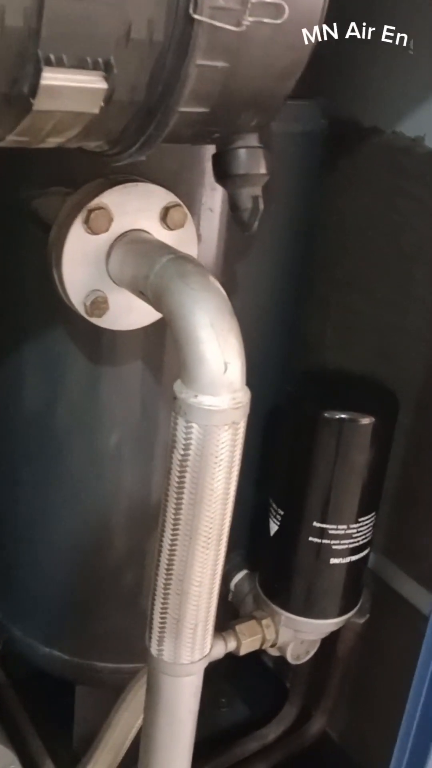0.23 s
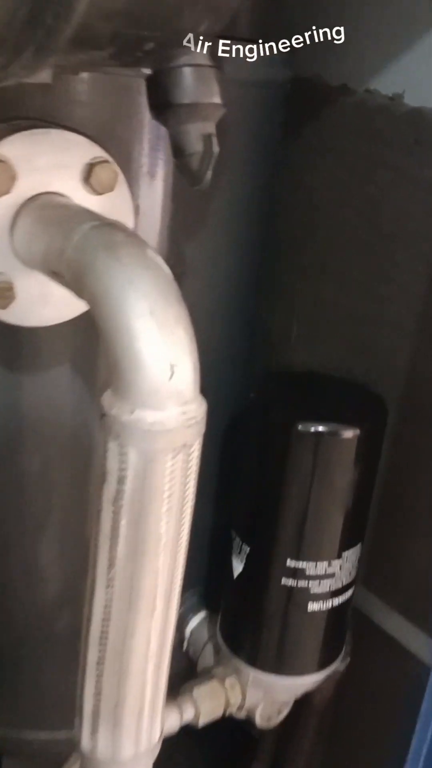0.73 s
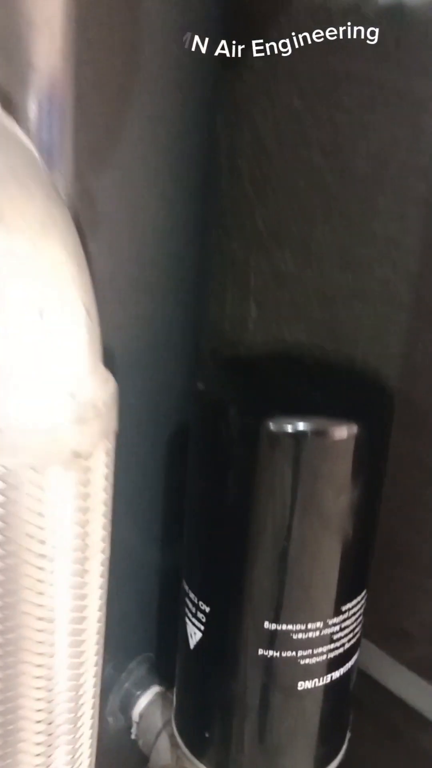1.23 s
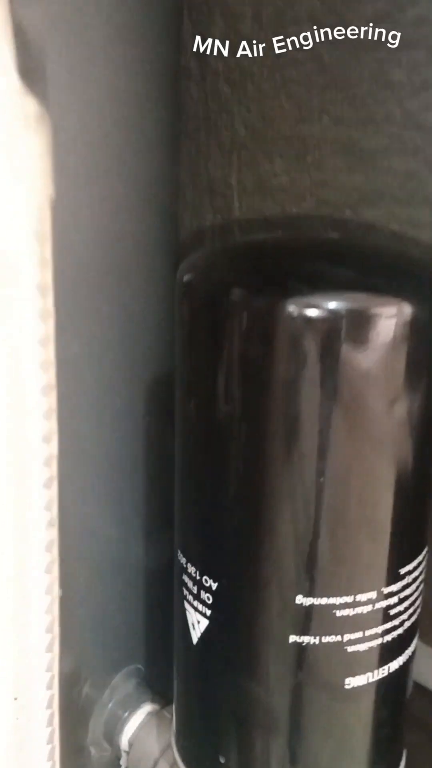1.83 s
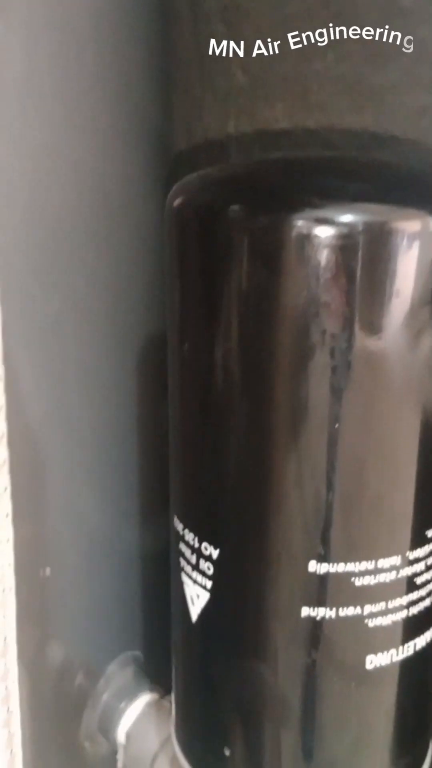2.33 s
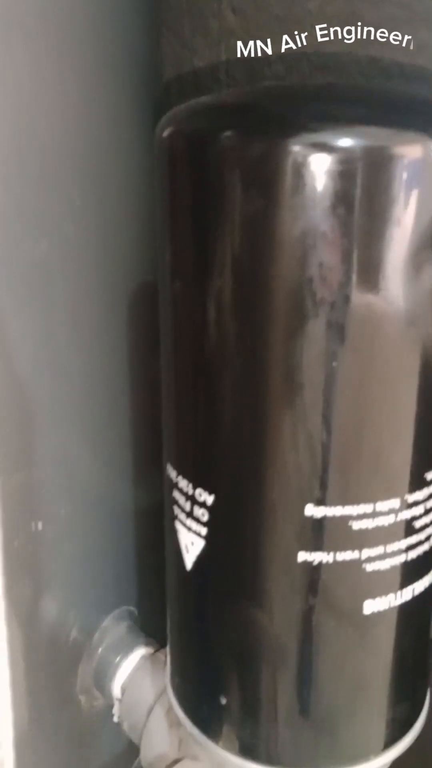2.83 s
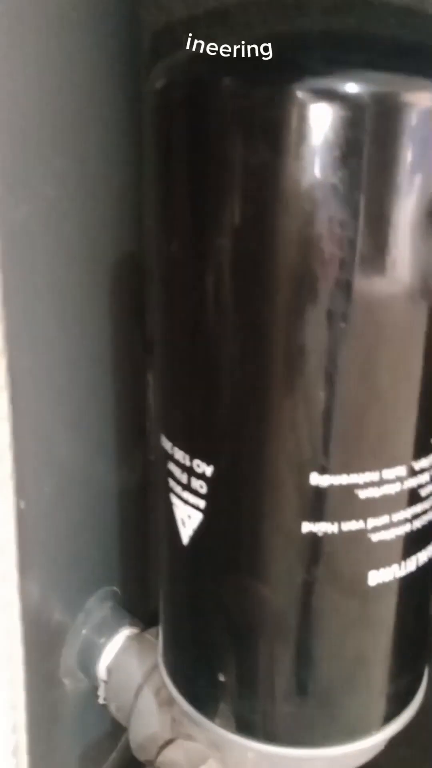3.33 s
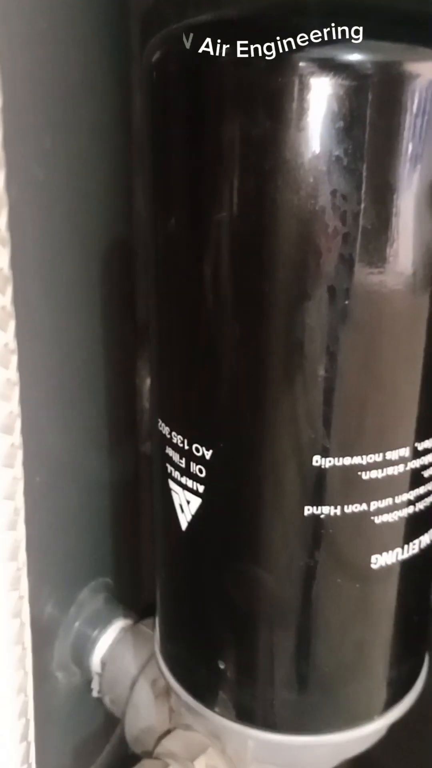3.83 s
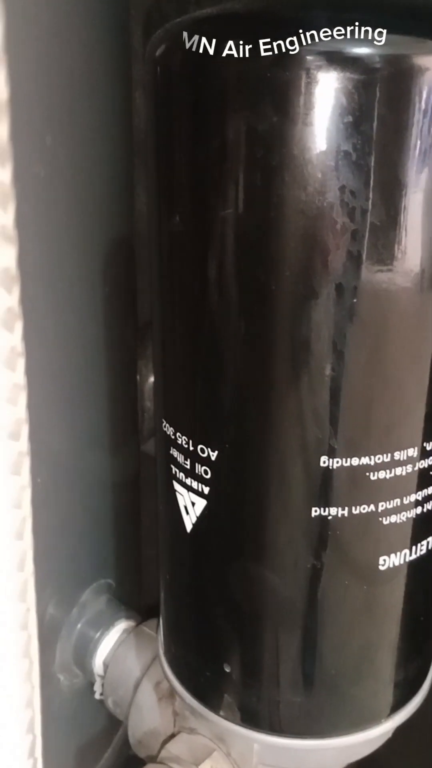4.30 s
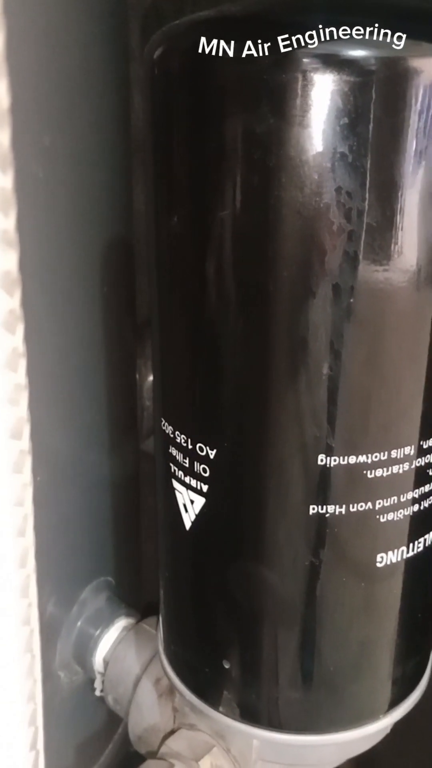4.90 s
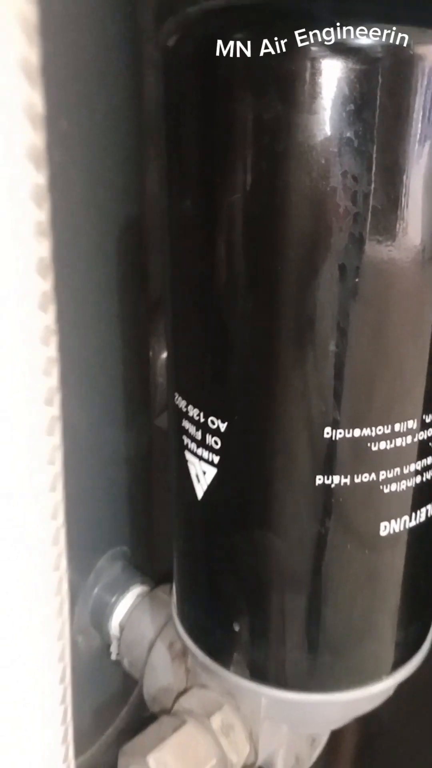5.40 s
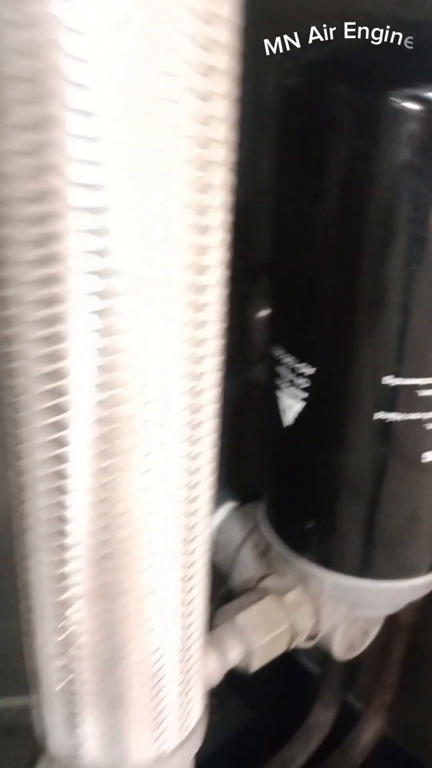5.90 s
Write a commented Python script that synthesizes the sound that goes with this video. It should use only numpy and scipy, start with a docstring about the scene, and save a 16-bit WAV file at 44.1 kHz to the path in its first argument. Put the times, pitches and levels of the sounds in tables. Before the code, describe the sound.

Close inside a running industrial compressor: constant wavering hum and drone, airy rush, faint electrical singing, and a hiss that grows slightly midway.

```python
"""Inside the cabinet of a screw compressor

A screw air compressor runs steadily; the microphone moves nearer to and farther from its oil filter.
Rotor lobes and cooling fan hum, the motor whines and its inverter sings faintly: all sums of sine tones.
Air rushes and hisses as shaped noise with sliding reflections, and rings in bands that swell and fade.
Level curves make the main tones swell and fade, as on a way through the cabinet's standing waves."""
import sys
import numpy as np
from scipy import signal
from scipy.fft import rfft, irfft
from scipy.io import wavfile
from scipy.ndimage import uniform_filter1d, map_coordinates

SR = 44100
rng = np.random.default_rng(int(sys.argv[2]) if len(sys.argv) > 2 else 0)


def pcm_store(signal):
    """Save signal as 16-bit PCM."""
    levels = np.round(np.clip(np.atleast_2d(signal), -1, 1) * 32767)
    wavfile.write(sys.argv[1], SR, levels.astype(np.int16).T)


N = 271215
T = np.arange(N) / SR  # seconds
HZ = np.fft.rfftfreq(N, 1 / SR)

# The microphone's changing nearness to the oil filter: away, close, a little back, close again.
# Each row: time in seconds, travel towards the filter in metres.
PATH = [(0, 0.17), (.8, 0), (2.3, 0.18), (3.4, 0.3), (4.3, 0.19), (5, 0.2), (6.15, 0.27)]


def gain_of(db):
    """Decibels to amplitude."""
    return 10 ** (np.asarray(db) / 20)


def evened(x):
    """Scales to rms 1."""
    return x / np.sqrt(np.mean(x ** 2) + 1e-20)


def curve(rows):
    """The second column of a timed table, joined by straight lines sample by sample."""
    s, values = np.transpose(rows)
    return np.interp(T, s, values)


def along_path(start_db, db_per_m):
    """Level in dB of a broad source, which grows with the microphone's travel towards the filter."""
    return start_db + db_per_m * curve(PATH)


def shape(points):
    """A spectrum in dB, joined on a log-frequency axis."""
    hz, db = np.transpose(points)
    return np.interp(np.log(HZ + 1), np.log(hz), db, right=-100)


def resonances(rows):
    """Peaks in dB that a set of resonances adds to a spectrum."""
    return sum(db / (1 + (2 * (HZ - hz) / width) ** 2) for hz, width, db in rows)


def above(edge_hz):
    """A smooth crossover: 0 well below the edge, 1 well above it."""
    return 1 / (1 + np.exp(-(HZ - edge_hz) / 300))


def noise(db):
    """Turbulence of rms 1 with the given spectrum."""
    return evened(irfft(rfft(rng.standard_normal(N)) * gain_of(db), N))


def drift(rate_hz, size=2048):
    """Slow chance of rms 1, up to about the given rate."""
    s = np.linspace(0, T[-1], size)
    smooth = np.exp(-(np.fft.rfftfreq(size, s[1]) / rate_hz) ** 2)
    coarse = evened(irfft(rfft(rng.standard_normal(size)) * smooth))
    return np.interp(T, s, coarse)


def tone(hz, db, clock, scatter, rate_hz):
    """A machine tone: a steady direct part plus reflections whose sum keeps changing."""
    angle = 2 * np.pi * (hz * clock + rng.random())
    in_step = (np.sqrt(2) + scatter * drift(rate_hz)) * np.cos(angle)
    out_of_step = scatter * drift(rate_hz) * np.sin(angle)
    return gain_of(db) * (in_step + out_of_step) / np.sqrt(1 + scatter ** 2)


def swell(middle_s, length_s):
    """A smooth rise and fall in amplitude; its power is down to 1/e at the ends of the length."""
    return np.exp(-2 * ((T - middle_s) / length_s) ** 2)


def swells(rows, base_db):
    """Amplitude of a steady flow with smooth puffs on top, added as powers."""
    puffs = sum((gain_of(db) * swell(s, length)) ** 2 for s, length, db in rows)
    return np.sqrt(gain_of(base_db) ** 2 + puffs)


def churned(x, middles_hz, depth_db, rate_hz):
    """Eddies of different sizes swell and ebb independently, each in its own band."""
    spectrum = rfft(x)
    bands = 0
    for corner in np.eye(len(middles_hz)):
        weight = np.interp(HZ, middles_hz, corner)  # overlapping triangles that add up to 1
        bands = bands + irfft(spectrum * weight, N) * gain_of(depth_db * drift(rate_hz))
    return evened(bands) * np.std(x)


def off_walls(x, path_ms, echo, count=6):
    """Reflections from panels on all sides comb the sound; the combs slide as the microphone moves."""
    sound_m_per_s = 343
    travel_s = uniform_filter1d(curve(PATH), SR // 2, mode="nearest") / sound_m_per_s
    out = x
    for direction in np.linspace(0, np.pi, count):
        delay_s = path_ms / 1000 * rng.uniform(0.2994, 2) + 2 * np.cos(direction) * travel_s
        out = out + echo * map_coordinates(x, [np.arange(N) - delay_s * SR], order=3, mode="grid-wrap")
    return evened(out)


def screw(clock):
    """Each rotor lobe lets out one puff of air: a clean harmonic hum."""
    lobe_hz = 198.65
    # The lobe hum across its standing waves. Each row: time in seconds, level in dB.
    lobe_level = [(0, -31), (.22, -30), (.37, -32), (.5, -28), (.75, -29.5), (1, -29.5), (1.25, -28.5),
                  (1.55, -32), (2.35, -35), (2.6, -32), (2.8, -37), (3.2, -35), (3.5, -41), (3.8, -36),
                  (4.03, -40.5), (4.25, -37), (4.6, -39.5), (4.95, -36), (5.4, -39), (5.6, -36),
                  (6.15, -34)]
    # The octave of the hum. Each row: time in seconds, level in dB.
    octave_level = [(0, -43), (.7, -42), (1, -37), (1.35, -39), (1.6, -43.5), (1.75, -44), (2.1, -50.5),
                    (2.8, -51.5), (5.45, -52.5), (5.9, -41.5), (6.15, -40.5)]
    # Weaker harmonics. Each row: multiple of the lobe rate, level in dB.
    lobe_orders = [(3, -50), (4, -52), (5, -49), (8, -67)]
    hum = tone(lobe_hz, curve(lobe_level), clock, scatter=0.13, rate_hz=3.7)
    hum += tone(2 * lobe_hz, curve(octave_level), clock, scatter=0.046, rate_hz=3)
    for k, db in lobe_orders:
        hum += tone(round(k) * lobe_hz, db, clock, scatter=0.27, rate_hz=2.2)
    return hum


def fan(clock):
    """The blades chop uneven air, so their tones flutter."""
    blade_hz = 175.92
    # The drone, at three times the blade rate. Each row: time in seconds, level in dB.
    blade_level = [(0.0, -29), (0.25, -31.5), (0.45, -28), (1.05, -38), (1.2, -34), (1.35, -41),
                   (1.6, -33.5), (1.8, -37), (2.55, -35.5), (3.95, -40), (4.9, -37.2), (5.05, -38),
                   (6.15, -32.5)]
    # Weaker harmonics. Each row: multiple of the blade rate, level in dB.
    fan_orders = [(1, -45.5), (2, -48.5), (4, -52), (7, -55.5)]
    drone = tone(3 * blade_hz, curve(blade_level), clock, scatter=0.14, rate_hz=10)
    for k, db in fan_orders:
        drone += tone(round(k) * blade_hz, db, clock, scatter=0.4, rate_hz=4)
    return drone


def motor(clock):
    """Magnetic whine over the many faint tones of the running gear."""
    # Pitches of the whine, then of two stronger tones of the running gear, in Hz.
    motor_hz = [1279.3, 1314.2, 1406.9, 1464.3, 3368.6, 4018.6]
    # One level curve for each pitch; short waves set crests and troughs close together.
    # Each row: time in seconds, level in dB.
    motor_1 = [(0.0, -55), (1.1, -70), (1.55, -44.5), (2.3, -51.6), (2.4, -69), (2.95, -47), (3.6, -45),
               (4.4, -65.6), (4.6, -52.3), (5.25, -52), (5.4, -47), (6.15, -50)]
    motor_2 = [(0.0, -36), (0.85, -49), (1.6, -46.1), (1.8, -58), (2.35, -47.5), (2.6, -45), (2.7, -66),
               (3.0, -42.5), (3.4, -69), (3.65, -47.5), (4.25, -39), (4.85, -46.5), (5.05, -54),
               (5.35, -47), (5.65, -50), (6.15, -42)]
    motor_3 = [(0.0, -59), (0.65, -47), (0.75, -43), (1.55, -59), (1.9, -41), (2.25, -48.5), (3.45, -48),
               (3.6, -59), (3.9, -49), (4.65, -58), (5.45, -42.5), (6.15, -47)]
    motor_4 = [(0.0, -59), (0.65, -65), (1.35, -49), (1.5, -56), (2.0, -43.5), (3.15, -43.5), (3.4, -58),
               (3.65, -43), (4.7, -47.5), (5.6, -41.5), (6.15, -52)]
    motor_5 = [(0, -72), (1.6, -77), (2.2, -67), (2.85, -62), (3.4, -67), (4.4, -68), (5.2, -74),
               (5.8, -66), (6.15, -70)]
    motor_6 = [(0, -72), (.25, -67), (.7, -84), (1.9, -76), (2.6, -71.5), (3.2, -69), (3.6, -77),
               (4.8, -74), (5.3, -82), (6.15, -72)]
    # Shafts, bearings and panels. Each row: frequency in Hz, level in dB before the path's change.
    side_tones = [(248.3, -54), (263.8, -55.2), (300.1, -53.5), (538.3, -52.6), (573.3, -55.9),
                  (695.1, -56.7), (734.8, -54.1), (816.2, -54.6), (917.9, -55.2), (1222, -55.5),
                  (1337.1, -57.7), (1372.1, -55.7), (1685, -58.5), (1759, -68.4), (1776.5, -63.5),
                  (1835.7, -67.0), (1869.4, -68.5), (1962.9, -70.0), (2206.5, -69), (2571.2, -70.3),
                  (3483.7, -74.5), (3555, -75.5), (3669.4, -71.5), (3740.7, -77.0), (3924.4, -75.5),
                  (3938.6, -79.5), (3969.5, -78.8), (4067.1, -80.8)]
    whine = 0
    for hz, rows in zip(motor_hz, [motor_1, motor_2, motor_3, motor_4, motor_5, motor_6]):
        whine = whine + tone(hz, curve(rows), clock, scatter=0.12, rate_hz=2.5)
    gear_db = along_path(start_db=-1.2, db_per_m=4)
    gear = sum(tone(hz, db + gear_db, clock, scatter=0.71, rate_hz=1.1) for hz, db in side_tones)
    return whine + gear


def inverter():
    """Switching tones sit on both sides of the carrier's multiples; three of them stand out."""
    carrier_hz, drive_hz = 3005.0, 44.52
    # The three strongest. Each row: multiple of the carrier, offset in multiples of the drive frequency.
    strong_sidebands = [(1, 1), (1, 3), (2, 2)]
    # One level curve for each of them. Each row: time in seconds, level in dB.
    sideband_1 = [(0.0, -59), (0.65, -67), (1.05, -68), (1.3, -75), (2.15, -58), (5.6, -65), (5.9, -54.5),
                  (6.15, -70.9)]
    sideband_2 = [(0.0, -79), (1.35, -60.5), (1.85, -73.9), (2.0, -63.5), (3.15, -67), (3.35, -59.5),
                  (5.6, -62.5), (6.15, -68)]
    sideband_3 = [(0.0, -79), (0.4, -66.5), (1.05, -87), (2.4, -70.3), (2.75, -95.6), (3.05, -70),
                  (3.25, -62.5), (5.35, -74.5), (5.55, -66), (6.15, -78.8)]
    # The weaker ones. Each row: multiple of the carrier, offset in multiples of the drive frequency,
    # level in dB before the path's change.
    sidebands = [(1, -3, -65.5), (1, -1, -77.5), (1, 5, -81.5), (1, 9, -69.5), (2, -2, -74.5),
                 (2, 0, -84.5), (2, 4, -85), (3, -9, -76.5), (3, -7, -69.5), (3, -5, -76.5), (3, -1, -84),
                 (3, 1, -79.5), (3, 7, -85.5), (4, -8, -88), (4, -2, -88.5)]
    singing = 0
    for (k, m), rows in zip(strong_sidebands, [sideband_1, sideband_2, sideband_3]):
        singing = singing + tone(k * carrier_hz + m * drive_hz, curve(rows), T, scatter=0.15, rate_hz=3.2)
    reach_db = along_path(start_db=-5, db_per_m=16)
    for k, m, db in sidebands:
        hz = round(k) * carrier_hz + round(m) * drive_hz
        singing = singing + tone(hz, db + reach_db, T, scatter=0.55, rate_hz=1.4)
    return singing


def buffeting():
    """Puffs of cooling air buffet the microphone over a fainter draught."""
    # Each row: frequency in Hz, relative density in dB per Hz.
    buffet_spectrum = [(20, -26), (36, -22), (50, -9.5), (62, -5), (76, -6), (95, 5.5), (125, 0), (200, -5),
                       (400, -47.5)]
    # Puffs. Each row: middle in seconds, length in seconds, level in dB before the flutter.
    gusts = [(.66, 0.13, -45.5), (1.45, 0.11, -45), (1.75, 0.21, -44), (2.36, .22, -43), (2.66, .16, -42.5),
             (2.95, .12, -42), (3.62, 0.089, -46.5), (3.92, 0.28, -39.5), (4.35, .15, -42),
             (4.8, 0.28, -43.5), (5.05, .2, -47.5), (5.4, 0.13, -44), (5.8, .25, -50)]
    flutter_db = 1.2 * drift(rate_hz=10)
    return noise(shape(buffet_spectrum)) * swells(gusts, base_db=-52.5) * gain_of(flutter_db)


def rumble():
    """Cooling air rumbles, and each band of the rumble churns on its own."""
    # Each row: frequency in Hz, relative density in dB per Hz.
    rumble_spectrum = [(30, -46), (75, -21), (100, -11.5), (135, -2), (170, 2), (215, -4.5), (300, -1),
                       (400, -16), (700, -36.5)]
    # Middles of the churning bands, in Hz.
    eddy_hz = [100, 160, 236, 348]
    flow = churned(noise(shape(rumble_spectrum)), eddy_hz, depth_db=1.0, rate_hz=16)
    return flow * gain_of(along_path(start_db=-41.5, db_per_m=11.8))


def air_rush():
    """Cooling air rushes between ringing panels; its upper part has a level of its own."""
    # Each row: frequency in Hz, relative density in dB per Hz.
    rush_spectrum = [(80, -32), (180, -1.5), (320, 0.5), (430, -1), (520, -0.5), (640, -1), (780, -0.5),
                     (960, -1), (1070, -4), (1250, -4), (1450, -2), (1560, -7.5), (2000, -11), (2600, -12),
                     (2950, -16), (3500, -19.5), (4100, -27.5), (5200, -49)]
    # Ringing cabinet panels. Each row: frequency in Hz, width in Hz, change of the spectrum in dB.
    panels = [(240, 13, 2), (493, 28, 3), (531, 20, 2.5), (735, 30, 1), (830, 33, 1.5), (890, 24, 3.5),
              (968, 31, 5), (1155, 27, -0.5), (1320, 36, 2.5), (1388, 50, 5.5), (1490, 36, 2),
              (1645, 44, 2.5), (2790, 82, 1)]
    # The upper rush, shaded by filter and pipes. Each row: time in seconds, relative level in dB.
    upper_level = [(0, -.6), (.5, -1), (.85, -2), (1.4, -3), (2.1, -0.5), (2.45, -0.8), (3.25, -0.5),
                   (3.55, -0.5), (3.85, 0.5), (4.5, -1.5), (5.3, -1.5), (5.85, 0.7), (6.15, 0)]
    rush = off_walls(noise(shape(rush_spectrum) + resonances(panels)), path_ms=8, echo=0.13)
    upper = irfft(rfft(rush) * above(2400), N)
    lower = rush - upper
    rush_db = along_path(start_db=-35.5, db_per_m=3.3) + 0.5 * drift(rate_hz=11)
    return (lower + upper * gain_of(curve(upper_level))) * gain_of(rush_db)


def pipes():
    """Compressed air hisses in the pipes; the very top of the hiss flickers in patches."""
    # The hiss. Each row: frequency in Hz, relative density in dB per Hz.
    hiss_spectrum = [(4000, -36.5), (5600, -23.5), (6150, -11.5), (6500, -5.5), (7500, 0), (8600, -1.2),
                     (9000, -7.5), (9300, -17.5), (10100, -13), (11300, -21.5), (12000, -19), (13000, -20),
                     (14000, -32.5), (15400, -22.5)]
    # Resonances of the pipes. Each row: frequency in Hz, width in Hz, change of the spectrum in dB.
    pipe_modes = [(5850, 130, 5), (6480, 240, 3), (7350, 260, 2.5), (8010, 200, 2.5), (10200, 200, 1.5)]
    # Level of the hiss before its flicker. Each row: time in seconds, level in dB.
    hiss_level = [(0, -51), (.7, -52), (1.3, -51.5), (2.15, -51), (2.5, -50), (2.8, -50), (3.05, -49.5),
                  (3.55, -49), (3.87, -49), (4.25, -50.5), (5, -50.5), (6.15, -50)]
    # A thin, higher hiss. Each row: frequency in Hz, relative density in dB per Hz.
    spurt_spectrum = [(7000, -13), (9500, -9), (10500, -3), (11050, -4), (11400, -14), (12400, -3),
                      (14000, -9.5), (15500, -10)]
    # Its spurts. Each row: middle in seconds, length in seconds, level in dB before the flicker.
    spurts = [(2.55, .35, -69.5), (3.03, .26, -62.5), (3.4, .26, -65.5), (3.87, .42, -63.5),
              (3.85, .09, -61)]
    # Middles of the flickering bands, in Hz.
    flicker_hz = [10500, 11500, 12500, 13500, 14300, 15100]
    top = above(11200)
    hiss = off_walls(noise(shape(hiss_spectrum) + resonances(pipe_modes)), path_ms=3, echo=0.15)
    spectrum = rfft(hiss)
    reach = gain_of(curve(hiss_level) + 0.35 * drift(rate_hz=22))
    body = reach * irfft(spectrum * (1 - top), N)
    thin = reach * irfft(spectrum * top, N)
    thin = thin + noise(shape(spurt_spectrum)) * swells(spurts, base_db=-71.5)
    thin = churned(thin, flicker_hz, depth_db=2, rate_hz=30)
    return body + thin * gain_of(1.4 * drift(rate_hz=34) - 0.5)


def ringing_air():
    """Short and long swells of ringing air, each in its own low, middle or high band."""
    # Each row: middle in seconds, length in seconds, level in dB, frequency in Hz, width in Hz.
    ringing_bands = [(3.7, 1.7, -42, 152.4, 58), (3.45, 1.2, -51, 820, 260), (3.2, .6, -63.5, 3830, 600),
                     (3.55, 3, -48, 738, 50), (0.44, 0.29, -50, 1680, 50), (0.13, 0.33, -49, 1140, 50),
                     (5.8, .35, -49.5, 1160, 50)]
    ringing = 0
    for s, length, db, hz, width in ringing_bands:
        band_db = -40 * np.log10(1 + (2 * (HZ - hz) / width) ** 2)
        ringing = ringing + noise(band_db) * gain_of(db) * swell(s, length)
    return ringing


def whistle():
    """With the thin hiss at its height comes a breathy whistle that sinks: noise bands on a gliding tone."""
    # One row: middle in seconds, length in seconds, level in dB, pitch in Hz, glide in Hz per second,
    # width in Hz.
    whistle_row = (3.91, 0.2, -59, 10780, -2200, 750)
    s, length, db, hz, hz_per_s, width_hz = whistle_row
    pitch = hz + hz_per_s * np.clip(T - s, -length, length)
    angle = 2 * np.pi * np.cumsum(pitch) / SR
    band_db = -20 * np.log10(1 + (2 * HZ / width_hz) ** 2)
    breath = noise(band_db) * np.cos(angle) + noise(band_db) * np.sin(angle)
    return breath * gain_of(db) * swell(s, length)


def scene():
    """All rotating parts share one slight unsteadiness of speed; the inverter keeps exact time."""
    clock = T + np.cumsum(0.00025 * drift(rate_hz=2.76)) / SR
    machine = screw(clock) + fan(clock) + motor(clock) + inverter()
    air = buffeting() + rumble() + air_rush() + pipes() + ringing_air() + whistle()
    return (machine + air)[None]


def record(dry):
    """The recorder has a deep notch in the upper mids, steeper on its low side; then the band limit."""
    notch_hz, edge_hz = 4620, 15560
    soft_ends = signal.windows.tukey(N, .002)
    notch_width = np.where(HZ < notch_hz, 300, 480)
    notch_db = -30 * np.exp(-((HZ - notch_hz) / notch_width) ** 2)
    coloured = irfft(rfft(dry * soft_ends) * gain_of(notch_db), N)
    low_pass = signal.firwin(1023, edge_hz, window=("kaiser", 9), fs=SR)
    return signal.oaconvolve(coloured, low_pass[None], "same")


dry = scene()
out = record(dry)
pcm_store(out)
```